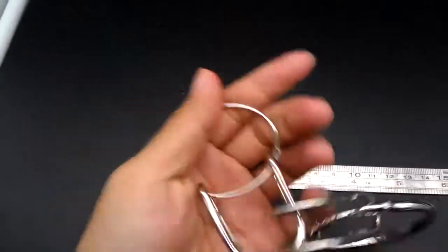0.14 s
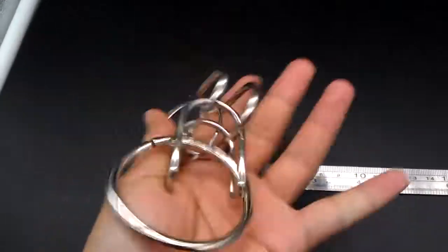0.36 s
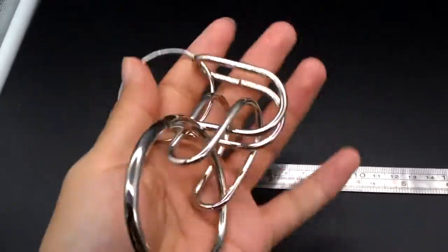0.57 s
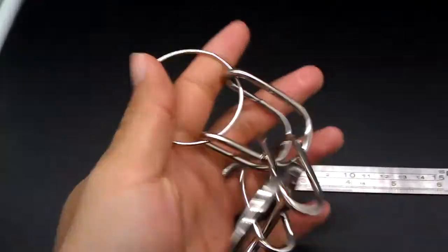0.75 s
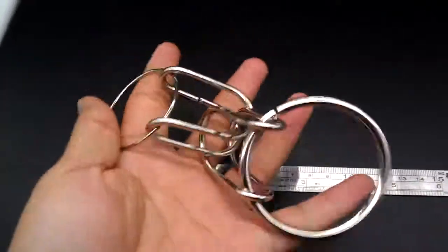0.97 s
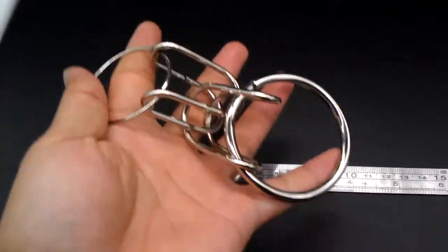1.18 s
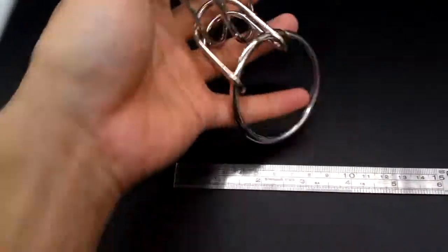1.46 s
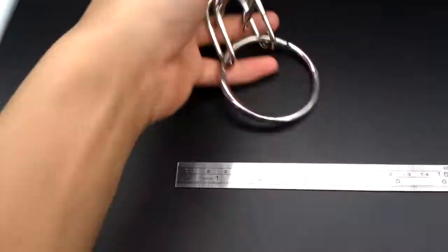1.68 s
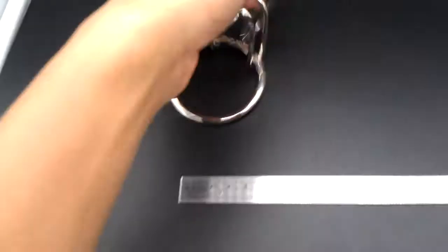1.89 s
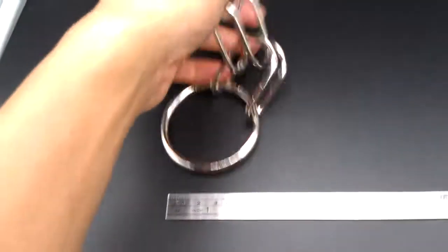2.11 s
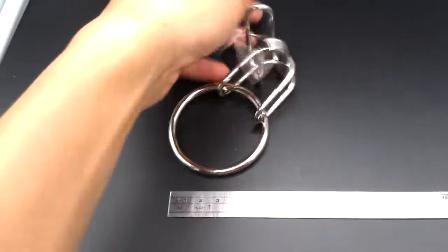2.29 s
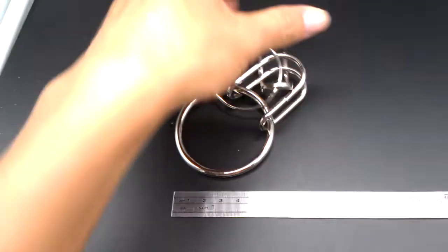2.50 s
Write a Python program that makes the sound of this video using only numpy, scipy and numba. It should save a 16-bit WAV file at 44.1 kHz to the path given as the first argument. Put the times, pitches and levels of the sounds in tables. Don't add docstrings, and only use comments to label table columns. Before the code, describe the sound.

Linked steel rings and wire loops jingle close to a phone microphone. Light clinks lead to sharp, loud blows around 0.2-0.5 s, then quick shaking until 1.05 s. After a lull, clinking resumes near 1.35 s, with dull wooden table knocks at 1.55 and 1.9 s. Softer rattles settle by 2.5 s. High, quickly damped ringing sits over steady fan hum and faint room air.

```python
import sys
import numpy as np
from scipy import signal
from scipy.fft import rfft, irfft
from scipy.io import wavfile
from scipy.ndimage import uniform_filter1d
from numba import njit

SR = 44100
rng = np.random.default_rng(int(sys.argv[2]) if len(sys.argv) > 2 else 0)


def voltage_ratio(level):
    return 10 ** (np.asarray(level, float) / 20)


def output_pcm(signal):
    pcm = np.clip(np.atleast_2d(signal).T, -1, 1) * 32767
    wavfile.write(sys.argv[1], SR, np.round(pcm).astype(np.int16))


N = 116865
MID_TO_SIDES = np.array([[1], [-1]])


def ring_mode(x, hz, t60):
    return signal.lfilter([1], [1, -np.exp(2j * np.pi * hz / SR - np.log(1000) / (t60 * SR))], x)


def add(out, x, s):
    start = max(int(s * SR), 0)
    length = min(x.shape[-1], N - start)
    out[:, start:start + length] += x[..., :length]


def read(table, hz):
    table = np.array(table)
    return np.interp(np.log(hz), np.log(table[:, 0]), table[:, 1])


def walk(rate_hz):
    hold = int(SR / rate_hz)
    stairs = np.repeat(rng.standard_normal(N // hold + 1), hold)
    return 1.3 * uniform_filter1d(uniform_filter1d(stairs, hold), hold)[:N]


# [f/Hz, level/dB per Hz]
AIR_COLOUR = [(30, -56.5), (100, -10.5), (250, -11.5), (600, -14), (1100, -22), (2000, -26), (4000, -36.5),
              (14300, -40.5)]
# [f/Hz, width/Hz, level/dB]
FAN_HOUSING = [(98, 14, -48), (151, 46, -45.5), (251.1, 13.5, -46), (506, 93, -52), (845, 23.4, -43),
               (1442, 37, -52)]
AIR_DB, AIR_RISE_DB = -42.5, 7
RUMBLE_RISE_S, RUMBLE_RISE_DB = 1.42, 9


def air():
    size = 2 ** 17
    t, f = np.arange(N) / SR, np.fft.rfftfreq(size, 1 / SR) + 1
    later = 1 / (1 + np.exp((RUMBLE_RISE_S - t) / .03))
    out = 0
    for hz in 30 * 2 ** np.arange(0, 9.1, .5):
        band = np.maximum(1 - 2 * abs(np.log2(f / hz)), 0) ** .5
        shape = voltage_ratio(read(AIR_COLOUR, f)) * band
        mid, side = (irfft(rfft(rng.standard_normal(size)) * shape)[:N] for _ in range(2))
        level_db = 1.7 * walk(7.7) + later * (1000 < hz < 4000) * AIR_RISE_DB
        out = out + voltage_ratio(level_db) * (mid + min((hz / 1100) ** 1.6, .9) * side * MID_TO_SIDES)
    out = out * voltage_ratio(AIR_DB) / out.std()
    for hz, width, db in FAN_HOUSING:
        mid, side = (ring_mode(rng.standard_normal(N), hz, 2.2 / width).real for _ in range(2))
        rise_db = RUMBLE_RISE_DB * (hz < 130) * later
        gain = voltage_ratio(db + rise_db + 0.99 * walk(14.0)) / mid.std()
        out = out + gain * (mid + min(hz / 3000, .9) * side * MID_TO_SIDES)
    return out


@njit
def bank(x, poles, ears, late):
    out = np.zeros((2, len(x)))
    for k in range(len(poles)):
        z = 0j
        for i in range(late[k], len(x)):
            z = z * poles[k] + x[i - late[k]]
            out[0, i] += (ears[0, k] * z).imag
            out[1, i] += (ears[1, k] * z).imag
    return out


FOCUS_DB, FOCUS_WIDTH = 6, 0.026
PAN_SCATTER_DB, LAG_SCATTER, LEFT_DB = 2.5, 1, 1.06
SPREAD_S, DETUNE = .002, 0.00084


def ring_steel(force, hz, mode_db, t60, scatter_db, focus_hz):
    place, pan, lag, tune, late = rng.standard_normal((len(hz), 5)).T
    focus = np.exp(-(np.log(hz / focus_hz) / FOCUS_WIDTH) ** 2)
    gain_db = mode_db + scatter_db * np.tanh(place) + FOCUS_DB * focus
    ear = voltage_ratio((LEFT_DB + PAN_SCATTER_DB * pan) / 2) * np.exp(1j * LAG_SCATTER * lag)
    poles = np.exp(2j * np.pi * hz * (1 + DETUNE * tune) / SR - np.log(1000) / (t60 * SR))
    late_samples = (abs(late) * SPREAD_S * SR / 2).astype(np.int64)
    return bank(force, poles, voltage_ratio(gain_db) * np.array([ear, 1 / ear]), late_samples)


RING = [(-21, 0.1), (-7, 0.057), (-13, 0.26), (-8, 0.804), (-13, 0.19), (1, 0.046), (1.5, 0.056),
        (-14, 0.26), (0.5, 0.13), (-0.5, 0.23), (-12.5, .2)]
RING_HZ = [2396, 4414, 6040, 7031, 8990, 9030, 10164, 12290, 12317, 13812, 13835]
LOOPS = [(-20.5, 0.34), (-18.5, 0.29), (-26.5, 0.45), (-18, .3), (-6.5, 0.097), (-11, 0.24), (-8, .15),
         (-6, 0.063), (-17, 0.16), (-13.5, 0.15), (-6.5, 0.33), (-6.5, 0.17), (-5.5, 0.067), (-23, 0.076)]
LOOP_HZ = [3553, 4100, 5351, 5862, 7375, 7704, 8580, 9528, 9663, 10347, 11647, 11850, 12010, 12385]
# [f/Hz, level/dB]
CLATTER = [(1200, -17.5), (2500, -12), (3900, -12), (5000, -5), (7500, -6), (10000, -6), (12500, -3.5),
           (14300, 0.5)]
# [f/Hz, half width/Hz]
GAPS = [(3880, 130), (4800, 170), (6720, 130), (8170, 200), (9940, 110), (11000, 450), (13020, 400)]
GAP_DB = -20
CONTACTS_PER_S, CONTACT_SCATTER_DB, CHATTER_FADE_DB = 500, 4.5, -7
PLACE_SCATTER_DB, CLATTER_SCATTER_DB, CLATTER_T60_S = 4, 5.5, .06
SCRAPE_DB, STEEL_DB, ATTACK_S = -0.7, -11.5, 0.00056


def clink(db, focus_hz, free_s, clatter_db, ring_db, grip_t60, weak_hz, size=5000):
    t = np.arange(size) / SR
    free_s = max(free_s, .003)
    where, force, rub = rng.random(size), rng.exponential(size=size), rng.standard_normal(size)
    fade = voltage_ratio(CHATTER_FADE_DB * t / free_s) / (1 + (t / free_s) ** 8)
    contacts = (where < CONTACTS_PER_S / SR) * voltage_ratio(CONTACT_SCATTER_DB * (np.minimum(force, 2) - 1.0))
    hits = contacts * fade + (t == 0)
    hits = hits / np.linalg.norm(hits)
    rub = rub * fade / np.linalg.norm(fade)

    strong_db, strong_t60 = np.array(RING + LOOPS).T
    strong_db = strong_db + ring_db * (np.arange(len(strong_db)) < len(RING))
    strong_hz = np.array(RING_HZ + LOOP_HZ)
    strong = ring_steel(hits + 0.19 * rub, strong_hz, strong_db, strong_t60, PLACE_SCATTER_DB, focus_hz)

    gap_db = GAP_DB * sum(np.exp(-((weak_hz - hz) / width) ** 4) for hz, width in GAPS)
    weak_db = read(CLATTER, weak_hz) + gap_db + clatter_db - 5.5
    scrape = hits + voltage_ratio(SCRAPE_DB) * rub
    weak = ring_steel(scrape, weak_hz, weak_db, CLATTER_T60_S, CLATTER_SCATTER_DB, focus_hz)

    grip = voltage_ratio(-60 * np.maximum(t - free_s, 0) / grip_t60) * (1 - np.exp(-t / ATTACK_S))
    return (strong + weak) * grip * voltage_ratio(db + STEEL_DB)


# [t/s, level/dB, loudest f/Hz, free time/s, clatter level/dB]
TOSS = [(0.0004, -14.5, 13900, 0.021, -1.5), (0.0144, -26, 13800, 0.064, 8),
        (0.063, -20.5, 11100, 0.046, -1), (0.1182, -24.5, 12900, 0.033, -4.5), (0.155, -29, 9800, 0.076, 9),
        (0.2134, -8, 10600, 0.012, 0), (0.337, -9.5, 10700, 0.0092, -2), (0.367, 3, 9030, 0.036, -26),
        (0.391, 0, 10400, 0.054, -5), (0.42, -1.5, 13800, 0.029, -10), (0.4454, -2.5, 9100, 0.013, -4.5),
        (0.4544, -2, 12300, 0.017, -36), (0.474, -14, 12500, 0.035, -37.5)]
SHAKE = [(0.596, -11, 12200, 0.029, -10), (0.6305, -15, 12850, 0.018, -13), (0.648, -15, 12600, 0.032, -11),
         (0.69, -9, 11670, 0.022, -21), (0.716, -12.5, 13380, 0.023, -4.5),
         (0.7597, -12.5, 12200, 0.019, -8), (0.789, -26, 12600, 0.068, 3.5),
         (0.814, -10.5, 13200, 0.039, -13.5), (0.836, -3, 9320, 0.028, -6.5),
         (0.858, -7, 13000, 0.023, -3.5), (0.8863, -11.5, 14700, 0.027, -6.5),
         (0.9216, -10, 11400, 0.032, -4.5), (0.966, -11.5, 8990, 0.025, -9.5),
         (1.0364, -18.5, 14100, 0.0098, -1)]
SWING = [(1.335, -36, 3770, 0.015, 11), (1.3685, -21, 12850, 0.0051, -3), (1.446, -20, 13900, 0.016, -2.5),
         (1.511, -34.5, 7700, 0.013, -10), (1.5561, -7, 13750, 0.046, -19.5), (1.599, -8, 13100, 0.022, -6),
         (1.6238, -8.5, 13550, 0.065, -14.5), (1.6622, -16, 10600, 0.013, 5),
         (1.6983, -30, 13560, 0.042, 6), (1.7483, -29, 14200, 0.018, 10), (1.7811, -19, 7030, 0.0435, 8.5),
         (1.8194, -3.5, 10630, 0.038, -3.5), (1.8691, -8.5, 14200, 0.042, 4),
         (1.8933, -9, 7020, 0.043, -10.5), (1.9262, -13.5, 13890, 0.06, 8.5),
         (1.992, -20.5, 13800, 0.082, 9.5), (2.0427, -16.5, 14500, 0.031, 2),
         (2.0637, -17, 11460, 0.027, -1)]
LAY = [(2.1463, -18, 11800, 0.017, 3.5), (2.1717, -18, 11100, 0.02, -1), (2.2552, -6.5, 10520, 0.037, -1),
       (2.2797, -15, 12650, 0.071, 9), (2.3095, -16, 9560, 0.11, 9.5), (2.3491, -12, 11840, 0.047, 5.5),
       (2.3811, -19, 12650, 0.047, -4), (2.4186, -26, 11400, 0.034, 9), (2.5368, -30.5, 12370, 0.015, -6)]
# [t/s, level/dB, loudest f/Hz, free time/s, clatter level/dB]
FURTHER = [(0.192, -15, 12800, 0.065, 2.5), (0.352, -6.5, 12200, 0.031, -0.5), (.561, -25, 12300, 0.06, -4.5),
           (.989, -6, 9000, 0.035, -9), (1.005, -8, 10600, 0.028, -20.5), (1.546, -16.5, 3525, 0.023, 2)]
# [ring level/dB, grip t60/s]
HANG = [
    (-1, 0.027),
    (-0.5, 0.12),
    (-0.5, 0.13),
    (-3, .06),
    (-1.5, .04),
]
# [t/s, level/dB, f/Hz]
BUMPS = [
    (0.34, -16, 1480),
    (1.552, -17.5, 2300),
    (1.665, -22.5, 1670),
    (2.262, -21, 1457),
]
BUMP_T60_S = 0.018


def steel():
    out = np.zeros((2, N))
    weak_hz = 1200 + 12900 * (np.arange(64) + rng.random(64)) / 64
    for clinks, hang in zip((TOSS, SHAKE, SWING, LAY, FURTHER), HANG):
        for s, *blow in clinks:
            add(out, clink(*blow, *hang, weak_hz), s)
    for s, db, hz in BUMPS:
        bump = ring_mode(np.arange(3000) == 0, hz, BUMP_T60_S).imag
        add(out, voltage_ratio(db) * np.array([[1.], [.5]]) * bump, s)
    return out


# [t/s, f/Hz, level/dB, hold/s,
# left over right level/dB]
SING = [(0.365, 12305.0, -10.0, 0.011, 2.0), (0.37, 8994.0, -9.0, 0.02, 5.0),
        (0.383, 12295.0, -11.0, 0.03, 0.0), (0.393, 6032.0, -16.0, 0.026, 2.0),
        (0.396, 10167.0, -6.0, 0.028, 5.0), (0.398, 7023.0, -23, 0.061, 8.0),
        (0.418, 13810.0, -7.0, 0.028, 5.0), (0.446, 9018.0, -9.0, 0.013, -2.0),
        (0.446, 12316.0, -9.0, 0.02, 8.0), (0.454, 10172.0, -10.0, 0.011, -13.0),
        (0.487, 12319.0, -20.0, 0.024, 4.0), (0.763, 12292.0, -20.0, 0.021, -4.0),
        (0.93, 12314.0, -21.0, 0.022, -1.0), (0.989, 9003.0, -18.0, 0.029, 0.0),
        (0.989, 12308.0, -17.0, 0.025, 0.0), (0.996, 13815.0, -17.0, 0.03, 5.0),
        (0.998, 10165.0, -18.0, 0.025, 8.0), (1.556, 8990.0, -22.0, 0.02, 0.0),
        (1.556, 10164.0, -21.0, 0.05, 0.0), (1.557, 13796.0, -17.0, 0.016, -4.0),
        (1.598, 12309.0, -20.0, 0.029, -3.0), (1.599, 13818.0, -16.0, 0.044, 3.0),
        (1.612, 10168.0, -20.0, 0.067, 1.0), (1.662, 10164.0, -19.0, 0.02, 0.0),
        (1.781, 7031.0, -23.0, 0.029, 12.0), (1.821, 7022.0, -20.0, 0.016, 7.0),
        (1.822, 4414.0, -27.0, 0.03, -4.0), (1.822, 8990.0, -20.0, 0.028, 0.0),
        (1.823, 12300.0, -12.0, 0.019, -6.0), (1.824, 10170.0, -12.0, 0.021, -2.0),
        (1.853, 13811.0, -19.0, 0.114, 1.0), (1.868, 4412.0, -22.0, 0.078, -9.0),
        (1.881, 7027.0, -16.0, 0.06, 9.0), (1.892, 10161.0, -15.0, 0.073, 3.0),
        (1.923, 13811.0, -14.0, 0.032, 2.0), (1.929, 12300.0, -18.0, 0.03, 0.0),
        (2.26, 10355.0, -14.0, 0.017, 10.0), (2.275, 11650, -25, 0.07, 0), (2.34, 5862, -30, 0.06, 4),
        (1.823, 11650, -21, .09, 0),
    (2.005, 11650, -25, .075, 0),
    (2.36, 12385, -24, .05, 0),
]
SING_DB, SING_RISE_S, SING_T60_S, SING_WOBBLE_DB = -3.5, .003, .045, 1.5


def sing():
    out, t = np.zeros((2, N)), np.arange(9000) / SR
    for s, hz, db, hold_s, pan_db in SING:
        hz = min(RING_HZ + LOOP_HZ, key=lambda mode_hz: abs(mode_hz - hz))
        turn = 2 * np.pi * rng.random(3)
        wobble_db = SING_WOBBLE_DB * np.sin(turn[2] + 2 * np.pi * 31 * t)
        touched_db = -60 * np.maximum(t - hold_s, 0) / SING_T60_S
        shape = np.tanh((t / SING_RISE_S) ** 2) * voltage_ratio(touched_db + wobble_db)
        sides = voltage_ratio(db + SING_DB + np.array([[pan_db], [-pan_db]]) / 2)
        lag = np.array([[0], [np.sin(turn[1])]])
        add(out, sides * shape * np.sin(2 * np.pi * hz * t + turn[0] + lag), s)
    return out


# [t/s, level/dB, push/s]
KNOCKS = [
    (1.5497, -8, 0.0031),
    (1.8982, -5.5, 0.0014),
]
# [f/Hz, level/dB, t60/s]
TABLE_TOP = [(114, -37, 0.11), (166, -16, 0.14), (266, -6, 0.093), (360, 3.5, 0.016), (541.5, -7, 0.091),
             (594, -4.5, 0.015)]


def table():
    out, t = np.zeros((2, N)), np.arange(8000) / SR
    for s, db, push_s in KNOCKS:
        push = np.sin(np.pi * np.minimum(t / push_s, 1)) ** 2
        push = push / push.sum()
        knock = sum(voltage_ratio(mode_db) * ring_mode(push, hz, t60).imag for hz, mode_db, t60 in TABLE_TOP)
        add(out, -voltage_ratio(db) * knock, s)
    return out


ROOM_T60_S, ROOM_DB = 0.12, -10


def scene():
    near, t = steel() + sing(), np.arange(8000) / SR
    tail = rng.standard_normal((2, len(t))) * voltage_ratio(-60 * t / ROOM_T60_S) * (t > .003)
    tail = tail / np.sqrt((tail ** 2).sum(axis=1, keepdims=True))
    room = voltage_ratio(ROOM_DB) * signal.fftconvolve(near, tail, axes=1)[:, :N]
    return near + room + table() + air()


def top_cut(x):
    return signal.sosfilt(signal.butter(12, 14350, fs=SR, output="sos"), x)


MIC_LOW_HZ, TOP_HZ, LIMIT = 111, 14250, .98


def record(dry):
    x = signal.sosfilt(signal.butter(4, MIC_LOW_HZ, "high", fs=SR, output="sos"), dry)
    x = signal.sosfilt(signal.ellip(12, .3, 90, TOP_HZ, fs=SR, output="sos"), x)
    mix = np.clip(x, -LIMIT, LIMIT)
    return top_cut(mix)


dry = scene()
out = record(dry)
output_pcm(out)
```